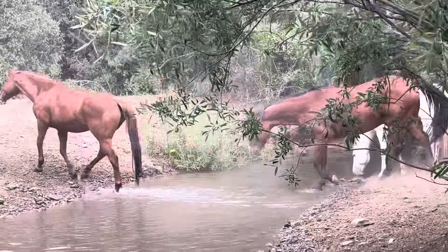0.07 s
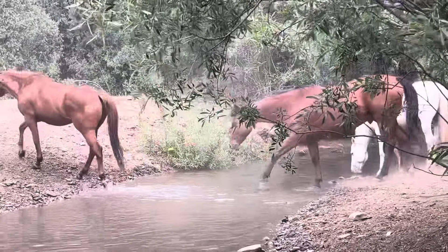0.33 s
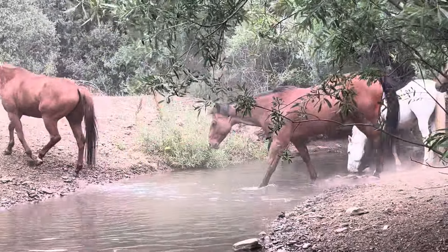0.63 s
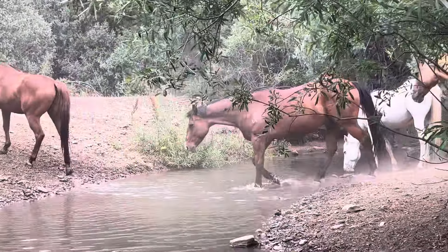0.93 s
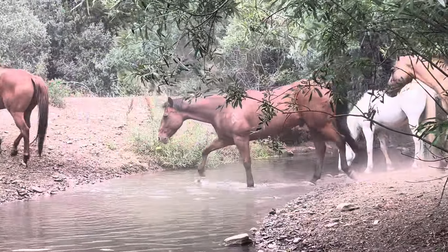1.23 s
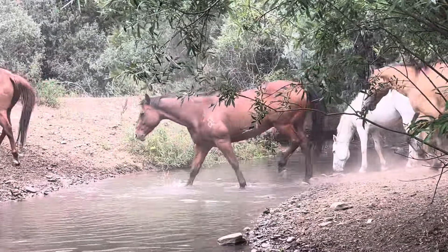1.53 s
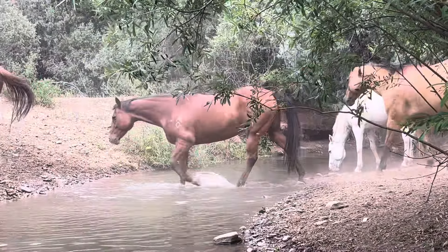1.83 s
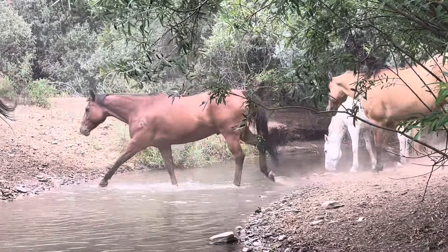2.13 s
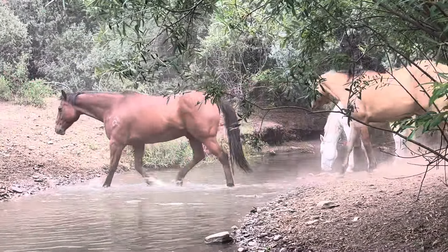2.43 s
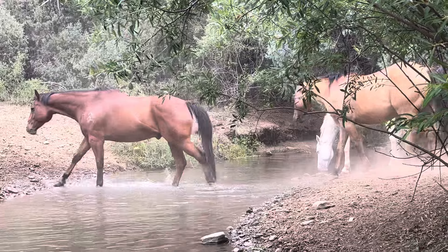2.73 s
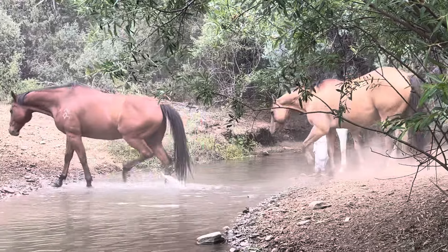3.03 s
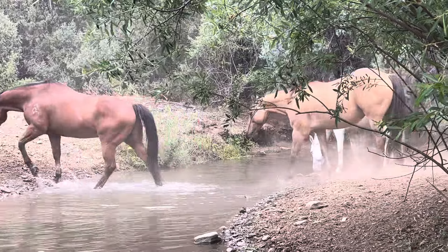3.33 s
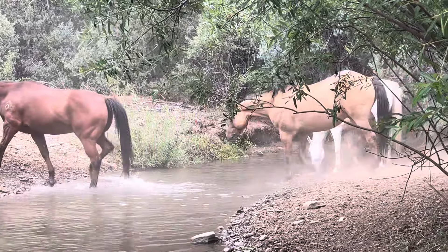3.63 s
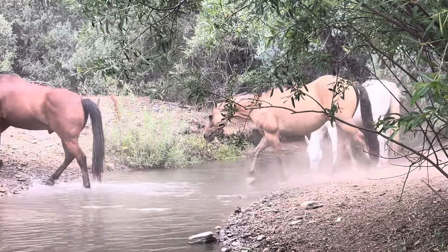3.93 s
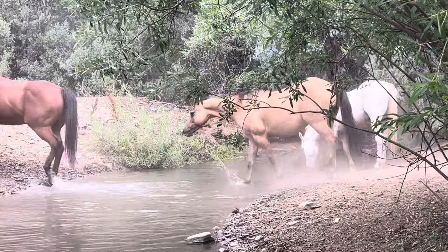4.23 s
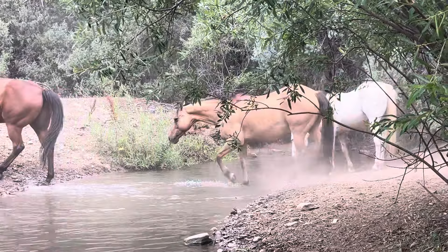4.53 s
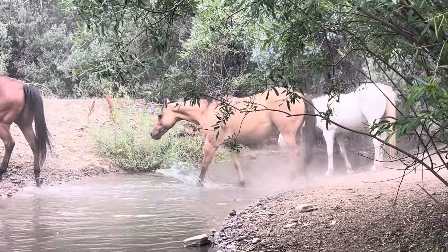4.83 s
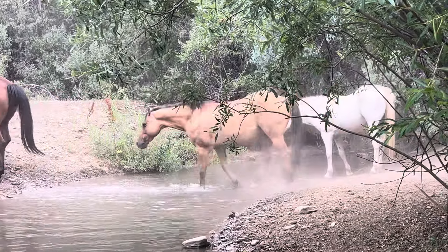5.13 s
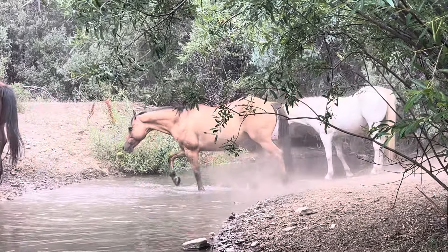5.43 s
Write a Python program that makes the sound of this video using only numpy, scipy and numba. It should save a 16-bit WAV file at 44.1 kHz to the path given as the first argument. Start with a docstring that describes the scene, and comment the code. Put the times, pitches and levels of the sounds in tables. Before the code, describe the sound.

Horses wade through a shallow creek outdoors, some metres away and nearly straight ahead, over a faint, steady rush and gurgle of current. From the start until about 1.4 seconds, hooves clack on stones with a little gravel crunch, while legs churn up bubbles and throw pattering spray. From about 1.4 seconds the hooves plunge harder, each slapping the surface with a hollow plop, amid sloshing, deep gulps and short glugs. The strongest splashes come near 1.5, 2.2 and 2.6 seconds. A low, fluttering rumble of shifted water peaks around 2.5 seconds and recedes after another plunge at 3.3 seconds. From about 3.8 seconds the stony clacks return and the splashing weakens, with a smaller plunge at 4.1 seconds and scattered bubbly plips. Light wading continues to the end at about 5.6 seconds, with hardly any echo.

```python
"""Horses wade through a shallow creek some metres away.
First hooves clack on stones, while swinging legs churn up bubbles and throw spray over the running water.
From about 1.4 s the hooves plunge hard: each slaps the surface and traps an air pocket that resonates.
Cavities gulp and glug, and a low rumble of shifted water swells to its height near 2.5 s.
After 4 s the splashes weaken among more clacks, and the current rushes and gurgles on underneath."""
import sys
import numpy as np
from scipy import signal
from scipy.fft import rfft, irfft, next_fast_len
from scipy.io import wavfile
from scipy.ndimage import uniform_filter1d
from numba import njit

SR = 44100
rng = np.random.default_rng(int(sys.argv[2]) if len(sys.argv) > 2 else 0)


def wav_record(signal):
    """Record a signal, one row per channel, as 16-bit PCM in the file named by sys.argv[1]."""
    frames = np.transpose(np.atleast_2d(signal))
    bounded = np.clip(frames, -1, 1)
    # unit amplitude maps onto the largest positive 16-bit level
    quanta = np.round(bounded * 32767).astype(np.int16)
    wavfile.write(sys.argv[1], SR, quanta)


N = 246078
T = np.arange(N) / SR


# hooves entering the water: start_s, pocket_db, pitch_hz, slap_db
HOOF_PLUNGES = [(0.746, -36.5, 760, -46.5), (1.121, -39, 547, -49), (1.409, -35, 804, -40),
                (1.444, -17, 515, -44), (1.491, -22.5, 465, -38), (1.9, -28, 534, -36.5),
                (2.2423, -14.5, 579, -30), (2.2535, -24, 618, -37), (2.305, -27.5, 550, -31),
                (2.343, -37, 466, -30.5), (2.357, -27, 470, -39.5), (2.568, -18.5, 522, -25.5),
                (2.587, -19, 500, -31.5), (3.282, -25.5, 520, -32), (4.098, -32, 545, -40),
                (4.108, -27.5, 605, -43.5), (4.945, -35, 1000, -49), (5.308, -28, 930, -42)]
# upper modes of the air pocket: pitch_ratio, level_db
POCKET_MODES = [(2.1, -18), (3.35, -20)]
# spectrum of the surface slap: frequency_hz, gain_db
SLAP_SPECTRUM = [(250, 17), (520, 11), (760, 2.5), (1300, 2.5), (2300, -2.5), (3100, -13.5), (12000, -40)]
def plunges(ring_cycles=25):
    """Cavity resonance: a hoof slaps the surface and traps air, which rings in several damped modes."""
    out, t = np.zeros(N), T[:SR // 4]
    for start_s, pocket_db, pitch_hz, slap_db in HOOF_PLUNGES:
        phase = 2 * np.pi * pitch_hz * t * (1 + t)
        detunings = 1 + .06 * rng.standard_normal(len(POCKET_MODES))
        upper = sum(undb(db) * np.sin(ratio * detune * phase)
                    for (ratio, db), detune in zip(POCKET_MODES, detunings))
        pocket = (np.sin(phase) + upper) * fade(t, ring_cycles / pitch_hz) * onset(t, 0.00091)
        push = (fade(t, 0.03) + undb(-22.5) * fade(t, 0.2)) * onset(t, 0.0049)  # impact, then wash
        slap = colour(rng.standard_normal(len(t)) * push, SLAP_SPECTRUM)
        slap = butterworth(slap, 3, pitch_hz / 2, "high")  # a small cavity has no bass
        slap /= np.sqrt(np.mean(slap[:SR // 80] ** 2))
        add(out, start_s, undb(pocket_db) * pocket + undb(slap_db) * slap)
    return out


# legs swinging through the water: fastest_s, churn_db, spray_db
STRIDES = [(0.05, -47.5, -56), (0.522, -47, -54), (0.74, -47.5, -61), (1.028, -50.5, -51.5),
           (1.38, -84, -52), (1.84, -45, -50.5), (2.04, -62, -50), (2.18, -56, -49.5), (2.38, -45.5, -63),
           (2.7, -43.5, -57), (2.83, -55, -47), (3.19, -50, -48.5), (3.421, -43.5, -54.5), (3.57, -46, -54),
           (3.812, -54.5, -52.5), (4.142, -43.5, -57), (4.45, -60, -53.5), (5.059, -58, -54),
           (5.24, -59, -53.5), (5.47, -60.5, -55.5)]
def strides(swing_s=0.09, churn_settle_s=0.3, spray_settle_s=0.19):
    """Power summation: each stride builds and settles, adding to the envelopes of churn and spray."""
    t = T[::100]
    fastest_s, churn_db, spray_db = np.transpose(STRIDES)[:, :, None]
    swing = np.exp(-(np.minimum(t - fastest_s, 0) / swing_s) ** 2)
    since_s = np.maximum(t - fastest_s, 0)
    stirred = undb(churn_db) * swing * np.exp(-since_s / churn_settle_s)
    thrown = undb(spray_db) * swing * np.exp(-since_s / spray_settle_s)
    return [np.interp(T, t, np.linalg.norm(each, axis=0)) for each in (stirred, thrown)]


# surge of shifted water, greatest with the near horse in midstream: time_s, level_db
SURGE = [(0.0, -53), (0.46, -58.5), (0.82, -61), (2.52, -43), (3.25, -45.5), (3.85, -71.5), (4.37, -52.5),
         (4.94, -67), (5.58, -73.5)]
def wading():
    """Amplitude modulation: strides and surge drive churn and spray; the rumble follows the surge."""
    surge = undb(np.interp(T, *np.transpose(SURGE)))
    stirred, thrown = strides()
    churning = np.hypot(stirred, surge * undb(-14))
    spraying = np.hypot(thrown, surge * undb(-11))
    return churn() * churning + sloshes() + spray() * spraying + showers() + rumble() * surge * undb(8.5)


# spectrum of churned water: frequency_hz, gain_db
CHURN_SPECTRUM = [(100, 11.5), (200, 0), (500, 2), (1300, -6.5), (2100, -13.5), (9000, -52)]
def churn():
    """Air entrainment: legs stir in many short-lived bubbles and a few longer-ringing plops."""
    bubbles = bubble_cloud(count=2600, low_hz=180, high_hz=4000, cycles=9, spread_db=2.6, rise=.2)
    plops = bubble_cloud(count=150, low_hz=500, high_hz=2200, cycles=26, spread_db=1.5, rise=.2)
    return unit(colour(bubbles + .42 * plops, CHURN_SPECTRUM))


# water shoved ahead of a leg: start_s, level_db, rise_s
SLOSHES = [(1.412, -36.5, 0.021), (1.52, -40.5, 0.024), (1.79, -42.5, 0.035), (1.9, -39.5, 0.018),
           (2.232, -32, 0.006), (2.47, -39, 0.032), (2.725, -42, 0.015), (3.225, -42, 0.025),
           (3.276, -35.5, 0.01), (3.545, -41.5, 0.014), (3.58, -44, 0.014), (4.525, -47, 0.017),
           (4.95, -51, 0.021), (5.26, -46.5, 0.019)]
# spectrum of its froth: frequency_hz, gain_db
SLOSH_SPECTRUM = [(250, 0.5), (550, 9.5), (1300, 4.5), (2200, -6.5), (7000, -21.5)]
def sloshes():
    """Displacement: water pushed by a leg wells up in a burst of ringing froth."""
    froth = bubble_cloud(count=4500, low_hz=270, high_hz=5000, cycles=15, spread_db=2.5, rise=.2)
    return unit(colour(froth, SLOSH_SPECTRUM)) * swells(SLOSHES)


# spectrum of falling spray: frequency_hz, gain_db
SPRAY_SPECTRUM = [(400, -14), (1000, 7), (3000, 3.5), (5000, -1), (8000, -7.5), (13000, -12.5)]
def spray():
    """Drop impact: droplets patter back on the surface as tiny resonances in a flickering hiss."""
    drops = bubble_cloud(count=16000, low_hz=700, high_hz=14000, cycles=16, spread_db=2.7, rise=.1)
    hiss = .5 * rng.standard_normal(N)
    return unit(colour(drops + hiss, SPRAY_SPECTRUM)) * undb(1.4 * wander(60))


# showers of kicked-up water: start_s, level_db
SHOWERS = [(0.098, -47.5), (0.464, -45.5), (0.982, -44), (1.626, -53.5), (1.766, -43.5), (1.862, -42.5),
           (2.188, -42.5), (2.483, -42), (2.778, -47.5), (3.464, -43.5), (3.8245, -44.5), (4.433, -50),
           (4.636, -49.5), (5.205, -55)]
def showers(rise_s=0.013):
    """Atomisation: freshly thrown water breaks into finer, crisper drops."""
    drops = bubble_cloud(count=36000, low_hz=1000, high_hz=14500, cycles=10, spread_db=3, rise=.1)
    bursts = swells([(start_s, level_db, rise_s) for start_s, level_db in SHOWERS])
    return unit(colour(drops, [(2500, -12.5), (13000, -33.5)])) * bursts


# hooves striking stones: start_s, level_db, pitch_hz
STONE_STRIKES = [(0.1451, -27.5, 2000), (0.5335, -35.5, 2090), (0.6663, -33.5, 1390), (1.059, -33.5, 1270),
                 (1.1237, -36.5, 2050), (1.3549, -34.5, 2120), (1.377, -33, 1320), (1.773, -36, 1850),
                 (3.849, -27.5, 1080), (4.1229, -36, 1760), (4.5199, -33.5, 1380), (4.814, -37.5, 1250),
                 (5.223, -38, 2090)]
# spectrum of the crack and crunch: frequency_hz, gain_db
CLACK_SPECTRUM = [(250, -4), (700, 6.5), (1400, 2.5), (2200, 6.5), (3500, 0.5), (6000, -4.5), (14000, -23)]
def clacks():
    """Impact excitation: a hoof cracks against a stone, which rings briefly; gravel crunches after it."""
    out, t = np.zeros(N), T[:SR // 4]
    for start_s, level_db, pitch_hz in STONE_STRIKES:
        crack, grit = rng.standard_normal((2, len(t)))
        contact = onset(t, 0.00013)  # water cushions the blow
        crunch = undb(-13.5) * grit * np.abs(grit) * fade(t, 0.19)
        hit = colour(contact * (crack * fade(t, 0.032) + crunch), CLACK_SPECTRUM)
        hit /= np.sqrt(np.mean(hit[:SR // 200] ** 2))
        stone = np.sin(2 * np.pi * pitch_hz * t) * fade(t, 0.017) * contact
        add(out, start_s, undb(level_db) * (undb(-6) * hit + stone))
    return out


# water closing behind a leg: start_s, level_db, pitch_hz
GULPS = [(0.055, -33.5, 67), (0.745, -34, 82), (1.014, -32.5, 76), (1.153, -32, 113), (1.445, -26.5, 171),
         (1.928, -20, 86), (2.107, -24.5, 76), (2.433, -25.5, 87.3), (2.975, -26.5, 85), (3.4, -28, 83)]
def gulps(rise_cycles=0.75):
    """Heavy damping: a large cavity swells and dies away within a few deep cycles."""
    out, t = np.zeros(N), T[:SR // 4]
    for start_s, level_db, pitch_hz in GULPS:
        age = pitch_hz * t / rise_cycles
        add(out, start_s, undb(level_db) * age * np.exp(1 - age) * np.sin(2 * np.pi * pitch_hz * t))
    return out


# cavities beside a leg: start_s, length_s, first_hz, last_hz, level_db
GLUGS = [(0.591, 0.02, 426, 390, -37), (0.65, 0.047, 398, 371, -32), (1.898, 0.026, 489, 222, -27.5),
         (2.584, 0.03, 447, 116, -22), (3.271, 0.031, 606, 223, -32), (4.259, 0.027, 550, 880, -38),
         (4.81, 0.014, 1037, 100, -43), (5.312, 0.02, 240, 140, -40)]
def glugs():
    """Resonance follows volume: a cavity's note falls as it widens and rises as it closes."""
    out = np.zeros(N)
    for start_s, length_s, first_hz, last_hz, level_db in GLUGS:
        age = np.linspace(0, 1, int(length_s * SR))
        phase = 2 * np.pi * np.cumsum(first_hz + (last_hz - first_hz) * age) / SR
        add(out, start_s, undb(level_db) * np.sin(np.pi * age) ** 2 * np.sin(phase))
    return out


# single large bubbles and drops: start_s, level_db, pitch_hz
LONE_BUBBLES = [(0.378, -35.5, 1020), (0.569, -36, 365), (0.823, -40, 535), (1.518, -30.5, 540),
                (1.531, -34, 880), (1.602, -34.5, 1430), (1.635, -35.5, 1400), (2.895, -30.5, 450),
                (3.219, -29, 1310), (3.462, -38, 520), (3.636, -34.5, 875), (3.808, -38.5, 595),
                (4.133, -30.5, 487), (4.3, -31.5, 766), (5.310, -28.5, 1330)]
def plips(cycles=21.0, rise=0.18):
    """Bubble resonance: each lone bubble rings briefly, rising in pitch."""
    start_s, level_db, pitch_hz = np.transpose(LONE_BUBBLES)
    starts = (start_s * SR).astype(np.int64)
    return ring_bubbles(starts, pitch_hz.copy(), np.full(len(starts), cycles), undb(level_db), rise)


# sharp smacks of thrown water: start_s, level_db
SMACKS = [(0.985, -45.5), (1.479, -49), (2.199, -46), (4.63, -51), (4.654, -46.5)]
def smacks(t60_s=0.08):
    """Broadband transient: thrown water hits the surface with a bright crack and a short fizz."""
    out, t = np.zeros(N), T[:SR // 10]
    for start_s, level_db in SMACKS:
        bright_noise = np.diff(rng.standard_normal(len(t) + 1))
        crack = butterworth(bright_noise, 1, 3000, "low")
        add(out, start_s, undb(level_db) * unit(crack) * fade(t, t60_s))
    return out


# spectrum of shifted water: frequency_hz, gain_db
RUMBLE_SPECTRUM = [(20, -22), (43, 14.5), (75, 16.5), (130, 9), (210, 1), (330, -36), (900, -60)]
def rumble():
    """Bulk motion: shifted water makes a low noise whose level flutters."""
    low = colour(rng.standard_normal(N), RUMBLE_SPECTRUM)
    low /= np.sqrt(uniform_filter1d(low ** 2, SR // 12) + 1e-12)  # even out the level
    flutter_db = 8 * np.tanh(.7 * wander(24))
    return low * unit(undb(flutter_db))


# spectrum of the current: frequency_hz, gain_db
CREEK_SPECTRUM = [(200, 1.5), (700, -21.5), (2000, -28), (3500, -20.5), (8000, -25), (13000, -27)]
def creek(rush_db=-61, gurgle_db=-68, gurgle_hz=1780, bandwidth_hz=170):
    """Flow noise: a soft broadband rush, with a narrow band that gurgles as its level wavers."""
    rush = unit(colour(rng.standard_normal(N), CREEK_SPECTRUM))
    gurgle = unit(resonate(rng.standard_normal(N), gurgle_hz, q=gurgle_hz / bandwidth_hz))
    waver_db = 9.7 * np.tanh(wander(4.4))
    return undb(rush_db) * rush + undb(gurgle_db + waver_db) * gurgle


def banks(x, t60_s, wet_db):
    """Diffuse scattering: banks and trees return a faint, dull tail, different in each ear."""
    t = T[:SR // 2]
    tails = rng.standard_normal((2, len(t))) * fade(t, t60_s) * onset(t, 0.0001)
    tails = [colour(tail, [(100, 5.5), (1500, 21.5), (9000, -8)]) for tail in tails]
    echoes = [signal.fftconvolve(x, tail / np.linalg.norm(tail))[:N] for tail in tails]
    return undb(wet_db) * np.array(echoes)


# phase between two microphone ports: frequency_hz, right_lead_turns
PORT_PHASE = [(1200, -.03), (1450, -.14), (1610, -.36), (1700, 0), (5100, 0), (5700, .14), (6700, .16),
              (8400, .5), (11100, 1), (13000, 1), (14700, 1.5)]
def ports(x, ring_hz=1910, ring_q=40, ring_db=-6):
    """Phase difference: two ports disagree near resonance and in the treble; the right rings faintly."""
    lead_turns = np.interp(np.arange(N // 2 + 1) * SR / N, *np.transpose(PORT_PHASE))
    half_shift = np.exp(1j * np.pi * lead_turns)
    left, right = irfft(rfft(x) * np.array([1 / half_shift, half_shift]), N)
    return np.array([left, right + undb(ring_db) * resonate(right, ring_hz, ring_q)])


def bubble_cloud(count, low_hz, high_hz, cycles, spread_db, rise):
    """Superposition: bubbles of random onset, pitch, life and strength merge into an even spectrum."""
    when, pitch, life, luck = rng.random((count, 4)).T
    pitch_hz = low_hz * (high_hz / low_hz) ** pitch
    gain = pitch_hz * undb(-spread_db * np.log(np.maximum(luck, np.exp(-4))))
    return unit(ring_bubbles((when * N).astype(np.int64), pitch_hz, cycles * (.5 + life), gain, rise))


@njit
def ring_bubbles(starts, pitch_hz, cycles, gain, rise):
    """Damped oscillation: each bubble's pitch climbs by the fraction `rise` as it nears the surface."""
    out = np.zeros(N)
    for k, start in enumerate(starts):
        length, phase = int(cycles[k] / pitch_hz[k] * SR) + 2, 0.
        for j in range(min(length, N - start)):
            phase += 2 * np.pi * pitch_hz[k] * (1 + rise * j / length) / SR
            out[start + j] += gain[k] * np.exp(-6 * j / length) * np.sin(phase)
    return out


def swells(bursts):
    """Critically damped envelopes: each burst wells up and dies away."""
    out, t = np.zeros(N), T[:SR // 2]
    for start_s, level_db, rise_s in bursts:
        age = t / rise_s
        add(out, start_s, undb(level_db) * age * np.exp(1 - age))
    return out


def colour(x, spectrum):
    """Minimum-phase filter through (frequency_hz, gain_db) points."""
    hz, db = np.transpose(spectrum)
    n = 2 * next_fast_len(len(x))
    bins_hz = np.arange(n // 2 + 1) * SR / n
    gain = undb(np.interp(np.log(bins_hz + 1), np.log(hz), db))
    cepstrum = irfft(np.log(gain))
    cepstrum[1:n // 2] *= 2  # folding onto positive time makes it causal
    cepstrum[n // 2 + 1:] = 0
    return irfft(rfft(x, n) * np.exp(rfft(cepstrum)), n)[:len(x)]


def butterworth(x, order, cutoff_hz, kind):
    """Maximally flat low-pass or high-pass filter."""
    return signal.sosfilt(signal.butter(order, cutoff_hz, kind, fs=SR, output="sos"), x)


def resonate(x, centre_hz, q):
    """Second-order resonance."""
    return signal.lfilter(*signal.iirpeak(centre_hz, q, fs=SR), x)


def wander(rate_hz):
    """Smooth random modulation of rms 1."""
    hold = int(SR / rate_hz)
    steps = np.repeat(rng.standard_normal(N // hold + 1), hold)
    return unit(uniform_filter1d(steps, hold)[:N])


def onset(t, rise_s):
    """First-order rise towards 1."""
    return 1 - np.exp(-t / rise_s)


def fade(t, t60_s):
    """Free exponential decay."""
    return np.exp(-np.log(1000) * t / t60_s)


def undb(db):
    """Decibels to gain."""
    return 10 ** (np.asarray(db) / 20)


def unit(x):
    """Scale to rms 1."""
    return x / np.sqrt(np.mean(x ** 2) + 1e-20)


def add(out, start_s, sound):
    """Superpose a sound at start_s."""
    i = int(start_s * SR)
    out[i:i + len(sound)] += sound[:max(N - i, 0)]


# stereo spread of the water: frequency_hz, side_minus_mid_db
WATER_WIDTH = [(60, -44), (150, -16.5), (900, -11), (1600, -10), (2200, -9), (4000, -59)]
def scene(right_bias_db=1.05):
    """Decorrelation: the horses are nearly ahead; an independent side signal spreads the water."""
    hooves = plunges() + plips() + clacks() + gulps() + glugs() + smacks()
    direct = ports(hooves + wading() + creek())
    side = colour(wading() + creek(), WATER_WIDTH)
    balance = undb(np.array([[-right_bias_db], [right_bias_db]]) / 2)
    return (direct + np.array([side, -side])) * balance + banks(hooves, t60_s=0.12, wet_db=-18.5)


def record(dry, bottom_hz=28, top_hz=14600):
    """Band limiting: filters cut the deepest bass and the highest treble."""
    lean = butterworth(dry, 2, bottom_hz, "high")
    return signal.sosfilt(signal.ellip(8, .2, 70, top_hz, fs=SR, output="sos"), lean)


dry = scene()
out = record(dry)
wav_record(out)
```